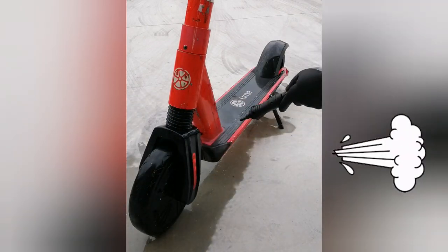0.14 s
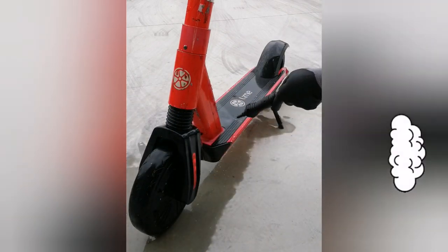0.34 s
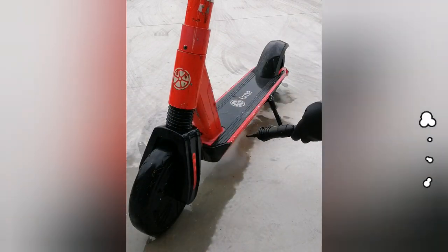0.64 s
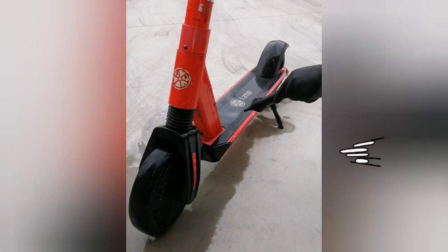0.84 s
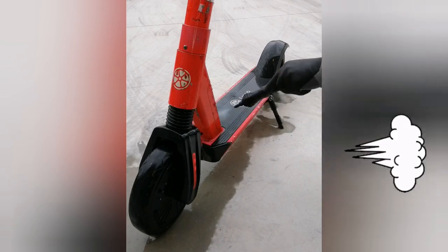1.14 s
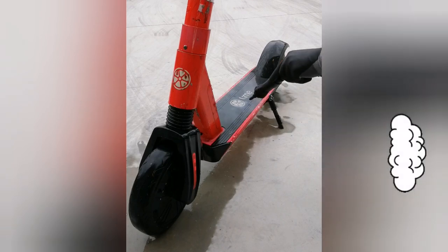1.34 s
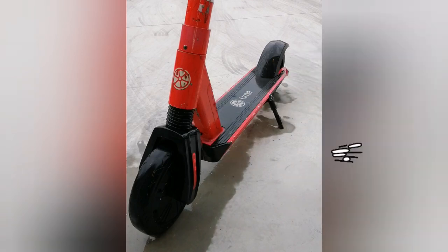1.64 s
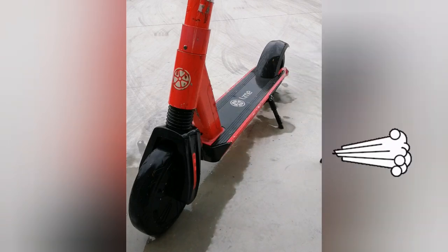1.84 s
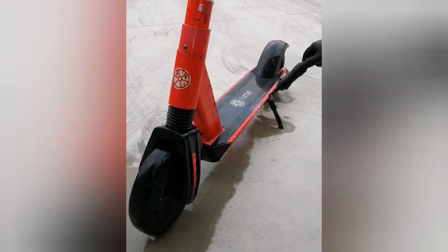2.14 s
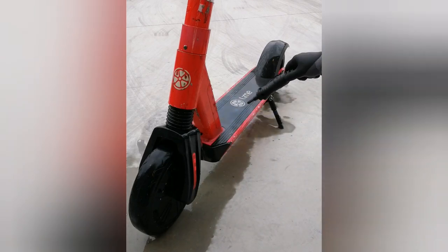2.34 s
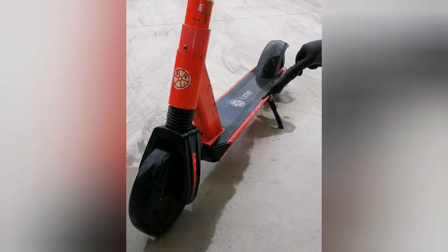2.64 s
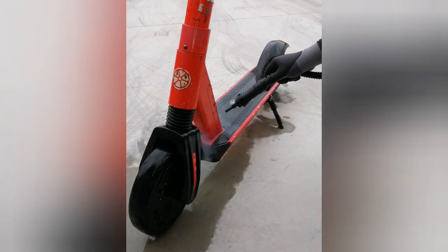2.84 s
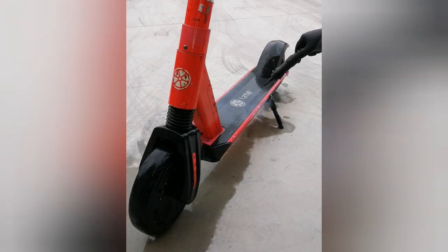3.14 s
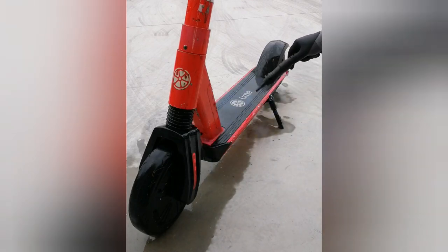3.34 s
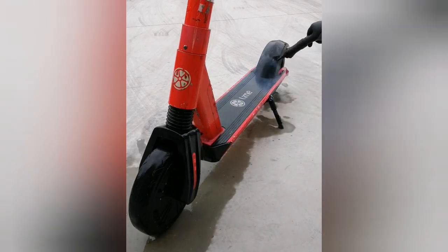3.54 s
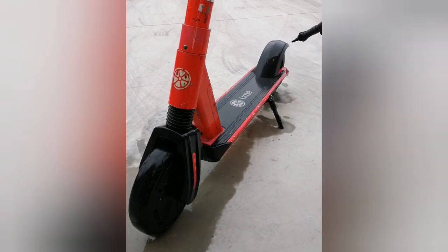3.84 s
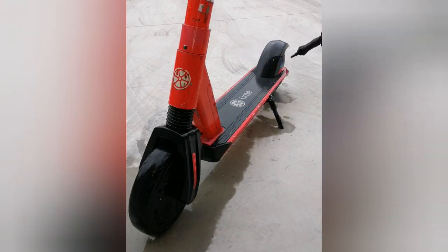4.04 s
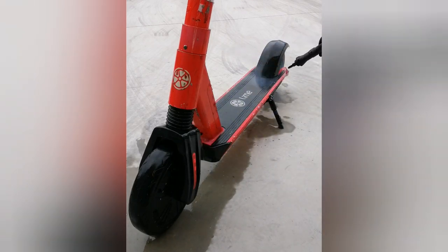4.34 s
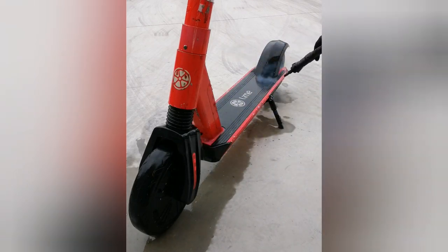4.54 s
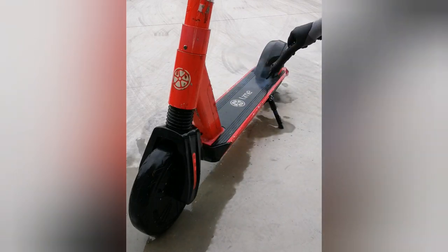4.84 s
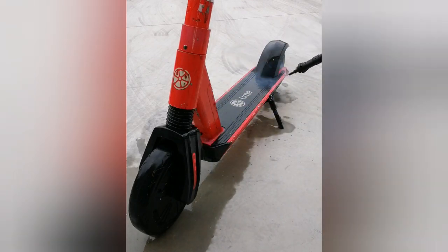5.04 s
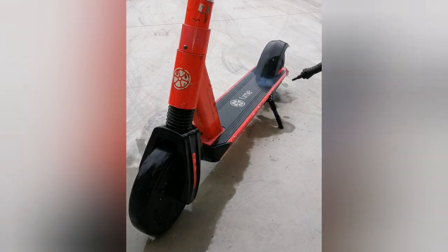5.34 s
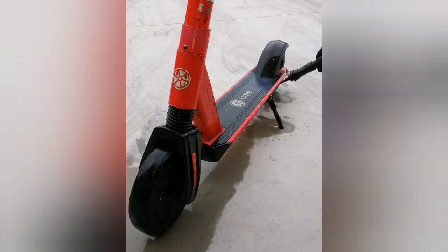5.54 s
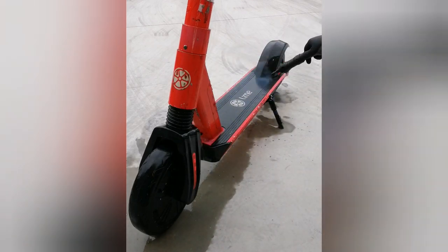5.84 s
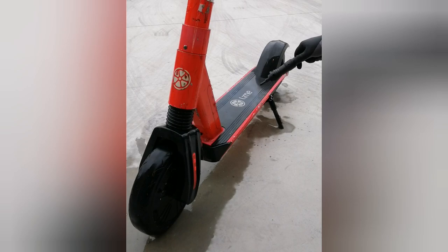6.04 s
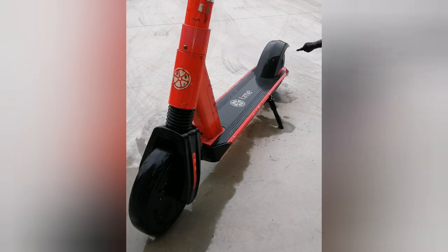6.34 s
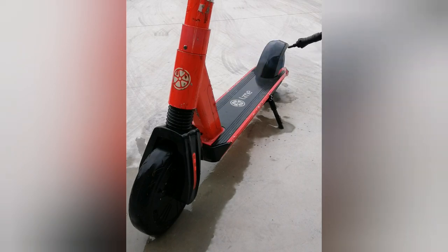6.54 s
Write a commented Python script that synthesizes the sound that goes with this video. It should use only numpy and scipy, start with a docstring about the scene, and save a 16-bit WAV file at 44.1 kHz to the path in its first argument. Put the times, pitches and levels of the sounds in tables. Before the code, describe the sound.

Pressurised steam hisses and rasps in uneven sweeps across a scooter deck, pausing briefly with a thump and plastic clicks before resuming.

```python
"""On a concrete floor indoors, a steam cleaner wand is swept over an electric scooter.
Steam is shaped noise: a bright nozzle hiss, a rasp on the deck, a roar in hollows, spurts at edges.
It drops to a leak for a moment, with a dull thump and two clacks, then bursts out again.
Clacks and thumps are ringing modes; a low noise rumble fills the room."""
import sys
import numpy as np
from scipy import signal
from scipy.io import wavfile
from scipy.ndimage import map_coordinates

SR = 44100
rng = np.random.default_rng(int(sys.argv[2]) if len(sys.argv) > 2 else 0)


def int16_out(signal):
    """Quantize to a 16-bit WAV file."""
    q = np.round(np.clip(np.atleast_2d(signal).T, -1, 1) * 32767)
    wavfile.write(sys.argv[1], SR, q.astype(np.int16))


N = 295911
TIME = np.arange(N) / SR


def from_db(db):
    """Decibels to gain."""
    return 10 ** (np.asarray(db) / 20)


def rms_one(x):
    """Scale to unit power."""
    return x / np.sqrt(np.mean(x ** 2) + 1e-20)


def in_time(rows):
    """Interpolate (seconds, value) rows at every sample."""
    s, value = np.transpose(rows)
    return np.interp(TIME, s, value)


def at_hz(points, hz):
    """Read a spectrum on a log-frequency axis."""
    f, value = np.transpose(points)
    return np.interp(np.log(hz), np.log(f), value)


def pan(db):
    """Left and right gains for a left-minus-right level difference."""
    return from_db(np.array([[.5], [-.5]]) * db)


def drift(rate_hz):
    """Random wander of spread 1: noise through two equal poles at rate_hz."""
    step = 40  # samples between computed points
    r = np.exp(-2 * np.pi * rate_hz * step / SR)
    noise = rng.standard_normal(N // step + 2002)
    slow = signal.lfilter([1], [1, -2 * r, r * r], noise)[2000:]  # settled part
    return np.interp(np.arange(N) / step, np.arange(len(slow)), rms_one(slow))


def filtered(x, hz, kind, order=2):
    """Butterworth filter."""
    hz = np.clip(hz, 10, .45 * SR)
    sos = signal.butter(order, hz, kind, fs=SR, output="sos")
    return signal.sosfilt(sos, x + 1e-18)


def resonate(x, hz, width_hz):
    """A resonance with gain 1 at its top."""
    r = np.exp(-np.pi * width_hz / SR)
    zeros = np.array([1, 0, -1]) * (1 - r * r) / 2
    poles = [1, -(1 + r * r) * np.cos(2 * np.pi * hz / SR), r * r]
    return signal.lfilter(zeros, poles, x)


def ring(clicks, hz, t60_s):
    """A unit click sets a decaying sine of initial height 1 ringing."""
    r = np.exp(-np.log(1000) / (t60_s * SR))
    w = 2 * np.pi * hz / SR
    return signal.lfilter([0, np.sin(w)], [1, -2 * r * np.cos(w), r * r], clicks + 1e-18)


def spread(pair, hz):
    """Two unrelated noises become left and right: alike in the bass, diffuse in the treble."""
    # Each row: frequency in Hz, left-right likeness (1 = identical).
    likeness = [(50, 0.4), (290, 0.95), (640, 0.84), (1400, 0.38), (3100, 0.35), (6800, 0.013),
                (15000, .02)]
    alike = np.clip(at_hz(likeness, hz), -1, 1)
    middle = np.sqrt(1 + alike) * pair[0]
    side = np.sqrt(1 - alike) * pair[1]
    return middle + side * np.array([[1], [-1]])


def turbulence(colour, patchy_db, eddy_hz, count):
    """Stereo noise in bands that each swell and sink with the eddies; rms 1."""
    out = 0
    edges_hz = np.geomspace(colour[0][0], colour[-1][0], count + 1)
    white = rng.standard_normal((2, 2, N))
    for k, (low, high) in enumerate(zip(edges_hz, edges_hz[1:])):
        hz = np.sqrt(low * high)
        gain = from_db(at_hz(colour, hz) + patchy_db * drift(eddy_hz))
        # neighbouring bands draw on different noise
        band = filtered(white[k % 2], [low, high], "band")
        out = out + gain * spread(band, hz)
    return rms_one(out)


def room(x, t60_s, dull_hz):
    """Diffuse tail of bare walls: decaying low-passed noise, different at each ear."""
    t = TIME[:SR // 2]
    noise = filtered(rng.standard_normal((2, len(t))), dull_hz, "low", order=1)
    tail = noise * np.exp(-np.log(1000) * t / t60_s)
    tail = rms_one(tail) / np.sqrt(len(t))
    return signal.fftconvolve(np.atleast_2d(x), tail, axes=1)[:, :N]


def floor_bounce(x, share, lag_s, sway):
    """The floor returns the spray after a lag that changes as the wand moves: a faint swish."""
    echo = []
    for side in x:
        lag = lag_s * SR * np.exp(sway * drift(0.788))
        echo.append(np.interp(np.arange(N) - lag, np.arange(N), side))
    return (x + share * np.array(echo)) / np.sqrt(1 + share ** 2)


def arrive(x):
    """Offset the left ear in time against the right by fractional-sample reading."""
    # Each row: time in seconds, left-ear delay in seconds (negative = left leads).
    left_delay = [(0, 5e-5), (2.2, 9e-5), (3.5, 0), (6.7, -2e-5)]
    read = np.arange(N) - in_time(left_delay) * SR
    left = map_coordinates(x[0], [read], order=5, mode="nearest")
    return np.array([left, x[1]])


def room_rumble():
    """Low room noise in slowly wandering bands."""
    # Each row: frequency in Hz, relative density in dB per Hz.
    colour = [(22, -0.5), (55, -4), (90, -10), (160, -7), (400, -15.5), (2000, -14), (12000, -40)]
    return from_db(-58.5) * turbulence(colour, patchy_db=2.1, eddy_hz=4.9, count=10) * pan(-0.61)


def thumps():
    """Soft pushes on the microphone that swing for a few slow cycles."""
    # Each row: start in seconds, level in dB before the low-pass, pitch in Hz, t60 in seconds.
    pushes = [(0.048, -48, 65, 0.41), (1.709, -21.5, 54.6, 0.17), (1.738, -29.5, 85.5, 0.2),
              (1.750, -33, 193, 0.077), (1.935, -42, 47.7, 0.28), (2.48, -41, 52.7, 0.2)]
    swings = np.zeros(N)
    for s, level_db, hz, t60_s in pushes:
        click = np.arange(N) == round(s * SR)
        swings += from_db(level_db) * ring(click, hz, t60_s)
    return -filtered(swings, 320, "low") * pan(-4.0)


def clacks(rattle_db, rattle_s, crack_db):
    """Hard plastic contacts, each with a short faint rattle, crack and ring the wand's modes."""
    # Each row: start in seconds, relative level in dB, centre of the contact's sound in Hz.
    contacts = [(1.7962, -16, 2980), (1.7981, -21, 3000), (1.8480, -25.5, 905)]
    # Each row: mode in Hz, relative level in dB, t60 in seconds.
    wand = [(500, -2, 0.011), (817, -6.5, 0.024), (1200, -7, 0.013), (1720, -7.5, 0.016),
            (2670, -0.5, 0.012), (2980, -4, 0.0068), (3500, -2, 0.0096), (4200, 2, 0.0097),
            (4630, -5, .007), (5250, -2, .01), (8350, -4, .007)]
    force = np.zeros(N)
    for s, level_db, hz in contacts:
        age_s = TIME[:N - round(s * SR)]
        rattle = rng.standard_normal(len(age_s)) * np.exp(-age_s / rattle_s)
        touch = from_db(rattle_db) * rattle + (age_s == 0)
        force[N - len(age_s):] += from_db(level_db) * resonate(touch, hz, 1.54 * hz)
    body = np.zeros(N)
    for k, (hz, db, t60_s) in enumerate(wand):
        body += (-1) ** k * from_db(db - 4.5) * ring(force, hz, t60_s)
    body = filtered(body + from_db(crack_db) * force, 9000, "low", order=1)
    return (body + from_db(-14.5) * room(body, t60_s=0.13, dull_hz=2000)) * pan(-6.0)


def spurts(edge_noise_db):
    """Each edge or gap sings with a broad resonance over a bright rush: quick to catch, slower to let go."""
    # Each row: middle in seconds, relative level in dB, centre in Hz, width in Hz, length in seconds.
    crossings = [(0.33, -41.5, 4000, 500, .02), (0.723, -35, 7000, 2500, 0.033),
                 (0.787, -32.5, 8000, 2500, 0.018), (1.108, -42.5, 3800, 900, 0.024),
                 (1.232, -38.5, 1890, 2400, 0.028), (1.412, -45.5, 3740, 800, 0.035),
                 (1.533, -49, 860, 250, 0.043), (1.601, -34.5, 7000, 4000, 0.037),
                 (1.761, -44.5, 3980, 200, .016), (1.787, -49, 3450, 800, 0.034),
                 (1.921, -29.5, 7550, 3000, .016), (2.185, -46, 680, 400, 0.026),
                 (2.300, -37, 1200, 700, 0.019), (2.458, -36, 5000, 3900, 0.024),
                 (2.879, -32.5, 5100, 4500, 0.024), (2.997, -42, 1190, 900, 0.027),
                 (3.257, -52, 190, 90, 0.053), (3.524, -52, 775, 130, 0.063), (3.574, -40, 790, 200, 0.035),
                 (3.67, -45.5, 780, 250, 0.027), (4.218, -34, 1030, 700, 0.023),
                 (4.317, -41.5, 915, 500, 0.02), (4.434, -33, 2900, 1200, 0.019),
                 (4.572, -32.5, 3040, 1200, 0.027), (4.618, -30.5, 4530, 4000, 0.03),
                 (4.68, -39, 790, 110, .043), (4.967, -26, 3340, 800, .009),
                 (5.065, -28.5, 3300, 1200, .018), (5.286, -46.5, 794, 300, 0.035),
                 (5.289, -39, 327, 90, 0.042), (5.405, -37.5, 1350, 1400, 0.021),
                 (5.569, -33.5, 2280, 2400, 0.023), (5.642, -27, 3700, 800, .019),
                 (5.688, -26.5, 3780, 905, .026), (6.165, -34.5, 2800, 1800, 0.033),
                 (6.476, -32.5, 1490, 890, .016), (6.55, -37, 3200, 2000, 0.024),
                 (6.589, -36, 7000, 4500, 0.027)]
    out = np.zeros((2, N))
    for s, level_db, hz, width_hz, length_s in crossings:
        near = np.abs(TIME - s) < 2 * length_s
        noise = spread(rng.standard_normal((2, near.sum())), hz)
        tone = rms_one(resonate(noise, hz, width_hz))
        rush = rms_one(filtered(rng.standard_normal(noise.shape), [hz / 2, hz * 3.8], "band"))
        offset = (TIME[near] - s) / (length_s / 2)
        swell = np.exp(-np.abs(offset) ** np.where(offset < 0, 6, 2))
        out[:, near] += from_db(level_db) * swell * (tone + from_db(edge_noise_db) * rush)
    return filtered(out, 11600, "low") * pan(-1.2)


def sweep(start_s, length_s):
    """Swell, hold and fade of one sweep, 0 to 1; half height at its start and end."""
    attack_s, release_s = 0.028, 0.029
    rise = np.clip(.5 + (TIME - start_s) / attack_s, 0, 1)
    fall = np.clip(.5 - (TIME - start_s - length_s) / release_s, 0, 1)
    return rise * fall


def with_sweeps(steady, rows):
    """Gain of a steady sound with (start s, length s, dB) sweeps added in power."""
    power = steady ** 2
    for start_s, length_s, db in rows:
        power = power + (from_db(db) * sweep(start_s, length_s)) ** 2
    return np.sqrt(power)


def valve():
    """Trigger released: flow decays to a leak; pressed again: stored pressure escapes as a surge."""
    shut_s, shut_fall_s, leak_db = 1.64, 0.054, -24
    open_s, open_rise_s = 1.903, 0.021
    surge_db, surge_s = 4, .11
    closing = np.exp(-np.maximum(TIME - shut_s, 0) / shut_fall_s)
    opening = np.clip((TIME - open_s) / open_rise_s, 0, 1)
    flow = np.maximum(closing + opening, from_db(leak_db))
    return flow * from_db(surge_db * sweep(open_s, surge_s))


def hollow_roar_and_rush(supply):
    """Jet blown into hollows of the frame: a mid roar and a low rush, over stray steam."""
    # Each row: start in seconds, length in seconds, relative roar in dB, relative low rush in dB.
    hollows = [(0.005, 0.41, -51, -56.5), (0.539, 0.18, -49, -55), (0.906, 0.2, -52.5, -68),
               (1.217, .12, -53.5, -74), (2.094, 0.27, -54, -65), (2.676, 0.082, -54, -57),
               (2.85, 0.22, -60, -61), (3.1, 0.32, -56, -66), (3.472, .13, -50.5, -66),
               (3.66, 0.051, -47.5, -64), (3.77, 0.13, -61, -62), (3.999, 0.18, -44, -55),
               (4.167, 0.402, -40, -61.5), (4.72, 0.16, -50, -57), (4.935, 0.12, -54.5, -56.5),
               (5.047, 0.1, -39.5, -55), (5.311, 0.17, -48.5, -54), (5.499, 0.16, -47.5, -66),
               (6.15, 0.18, -41, -52), (6.316, .24, -46.5, -57)]
    # Each row of both: frequency in Hz, relative density in dB per Hz.
    roar_colour = [(480, -24), (590, -1), (740, 0.5), (1000, 2), (1400, -2.5), (1800, 1), (2700, -14.5)]
    rush_colour = [(190, -5), (260, -3), (340, 4), (500, 1.5), (800, -10.5)]
    roar_rows = [(s, length, db) for s, length, db, _ in hollows]
    rush_rows = [(s, length, db) for s, length, _, db in hollows]
    roar_gain = with_sweeps(supply * from_db(-58.5), roar_rows)
    rush_gain = with_sweeps(supply * from_db(-65), rush_rows)
    roar = from_db(0.5) * turbulence(roar_colour, patchy_db=2.5, eddy_hz=23, count=10) * pan(-1.9)
    rush = from_db(2.0) * turbulence(rush_colour, patchy_db=2.5, eddy_hz=10.3, count=5) * pan(-3.0)
    return roar_gain * roar, rush_gain * rush


def deck_rasp(supply):
    """Jet rasping across the deck: mid-treble noise in sweeps, over stray steam."""
    # Each row: start in seconds, length in seconds, relative level in dB.
    passes = [(0.0, 0.48, -54), (0.44, .12, -44.5), (0.642, .16, -46), (0.932, .21, -46.5),
              (1.222, 0.16, -52), (1.507, 0.035, -48), (1.916, 0.076, -49), (2.22, 0.49, -46),
              (2.837, 0.069, -46), (3.188, .58, -47), (3.866, 0.033, -45.5), (4.023, 0.13, -48),
              (4.174, 0.48, -41), (4.926, 0.236, -43.5), (5.04, 0.071, -36.5), (5.366, 0.58, -48),
              (5.59, 0.11, -42.5), (6.133, 0.18, -45), (6.458, 0.15, -48.5)]
    # Each row: frequency in Hz, relative density in dB per Hz.
    colour = [(1000, -17.5), (1700, -3), (2300, -4), (3100, 2), (4000, -2.5), (5200, -6.5), (8000, -18)]
    gain = with_sweeps(supply * from_db(-53.5), passes)
    return gain * from_db(1.5) * turbulence(colour, patchy_db=1.5, eddy_hz=26, count=10) * pan(-1.8)


def shrill_nozzle(jet, side_db):
    """Shrill nozzle tone: a narrow band of noise that follows the jet."""
    # Each row: time in seconds, level in dB relative to the jet gain.
    shrill_db = [(0, -10.5), (3.4, -6.5), (3.56, -1.5), (3.85, -8), (4.65, -2), (5.6, -3), (6.7, -5.5)]
    band = rms_one(filtered(rng.standard_normal((2, N)), [8950, 9600], "band"))
    return jet * from_db(in_time(shrill_db)) * band * pan(side_db + 5.5)


def nozzle_hiss(jet, side_db):
    """Bright noise of the free jet; its highest part beams forward from the nozzle."""
    # Each row: frequency in Hz, relative density in dB per Hz.
    colour = [(2500, -15), (4200, -8), (5500, -1.5), (6500, -2.5), (7500, -0.5), (8500, -6), (9600, -6),
              (11300, -16), (13000, -14.5), (15500, -15.5)]
    # Each row: time in seconds, lift around 13.3 kHz in dB.
    beam_db = [(0, 1.5), (0.35, -4), (0.7, -2), (0.9, 2.5), (1.6, 4.5), (2.0, 1.5), (3.6, 6), (4.35, 0),
               (4.7, 4), (4.9, -1), (5.1, 4.5), (6.7, 5.5)]
    hiss = turbulence(colour, patchy_db=1.5, eddy_hz=6.9, count=10)
    top = resonate(hiss, 13300, 3300)
    hiss = hiss + (from_db(in_time(beam_db)) - 1) * top
    return jet * from_db(2.0) * hiss * pan(side_db - 3.0)


def steam():
    """Hiss, shrill band, rasp and roar ride on one unsteady flow; the low rush does not."""
    # Free jet, louder as the nozzle turns toward the listener.
    # Each row: time in seconds, relative level in dB.
    jet_db = [(0.0, -38.5), (0.3, -44.5), (0.78, -43), (0.82, -49), (1.7, -49.5), (1.9, -40.5), (2.3, -40),
              (3.02, -40.5), (3.1, -42.5), (3.4, -42), (3.75, -45), (3.82, -49.5), (4.1, -46), (4.7, -43.5),
              (5.3, -45), (6.0, -46.5), (6.3, -47.5), (6.7, -51.5)]
    # The jet glances off a smooth face and hisses harder.
    # Each row: start in seconds, length in seconds, relative level in dB.
    glances = [(0.489, 0.1, -39.5), (0.687, 0.061, -40.5), (1.532, 0.12, -47), (3.539, 0.16, -42),
               (3.952, 0.038, -37.5), (4.296, 0.034, -38.5), (4.374, .025, -39.5), (4.527, 0.16, -39.5),
               (4.878, 0.11, -40), (5.375, 0.071, -45), (5.777, .055, -43), (6.136, 0.032, -41)]
    # Each row: time in seconds, left-right direction in dB before each layer's offset.
    aim_db = [(0, -1), (0.22, 3), (0.67, -1), (0.9, 1.5), (1.45, 2), (1.62, -2.5), (2.6, 3), (3.5, 2.5),
              (3.92, 4.5), (4.6, 2.5), (6.7, 3)]
    # Each row: time in seconds, flutter depth in dB (negative = inverted).
    flutter_depth_db = [(0, .5), (2.1, -1), (2.5, 3), (2.75, -0.5), (2.9, 2), (3.1, -1), (3.35, 2.5),
                        (3.55, 0.5), (6.7, 0)]
    flutter_hz, flutter_crest_s = 22.0, 2.505

    supply, side_db = valve(), in_time(aim_db)
    jet = with_sweeps(supply * from_db(in_time(jet_db)), glances)
    hiss = nozzle_hiss(jet, side_db)
    shrill = shrill_nozzle(jet, side_db)
    rasp = deck_rasp(supply)
    roar, rush = hollow_roar_and_rush(supply)

    flutter = np.cos(2 * np.pi * flutter_hz * (TIME - flutter_crest_s))
    flow = from_db(in_time(flutter_depth_db) * flutter + 1.23 * drift(54))
    sputter = from_db(1.48 * drift(38))  # wet steam where it lands
    return flow * (hiss + shrill + sputter * (rasp + roar)) + rush


def coloured_spray():
    """Steam and spurts through narrow resonances in series, then floor and walls."""
    # Each row: centre in Hz, width in Hz, lift in dB.
    resonances = [(366, 29, 1.5), (760, 41, 4), (1310, 51, 0), (1777, 40, 2), (2210, 7.2, 5.5),
                  (2900, 360, 2.5), (3264, 41, 2), (4000, 5, 0), (4430, 26, 5), (5640, 170, 2.5),
                  (7650, 630, 4.5)]
    spray = steam() + spurts(edge_noise_db=-19.0)
    for hz, width_hz, lift_db in resonances:
        spray = spray + (from_db(lift_db) - 1) * resonate(spray, hz, width_hz)
    spray = floor_bounce(spray, share=0.27, lag_s=.0014, sway=0.245)
    spray = spray + from_db(-15.5) * room(spray, t60_s=0.09, dull_hz=7000)
    return from_db(-0.19) * spray


def scene():
    """Spray and clacks with the ear delay, plus thumps and room rumble."""
    wand_sounds = coloured_spray() + clacks(rattle_db=-26.5, rattle_s=0.0062, crack_db=3)
    return arrive(wand_sounds) + thumps() + room_rumble()


def record(dry):
    """Steep elliptic low-pass at the top of the treble."""
    cutoff_hz = 15200
    sos = signal.ellip(12, .1, 80, cutoff_hz, fs=SR, output="sos")
    return signal.sosfilt(sos, dry)


dry = scene()
out = record(dry)
int16_out(out)
```